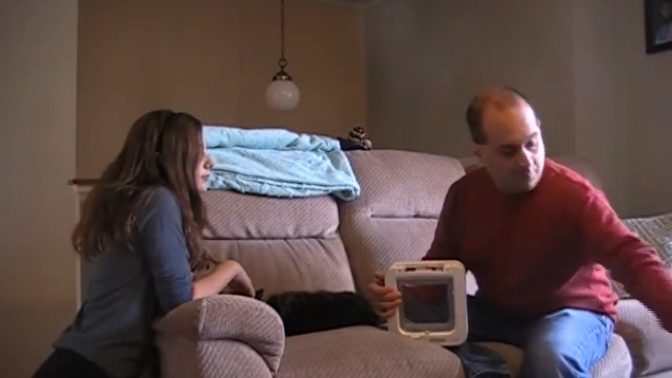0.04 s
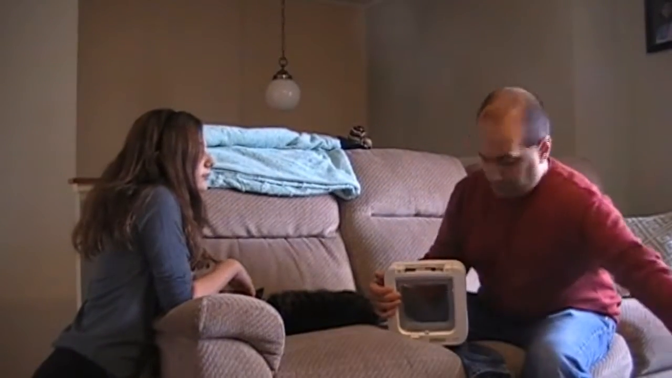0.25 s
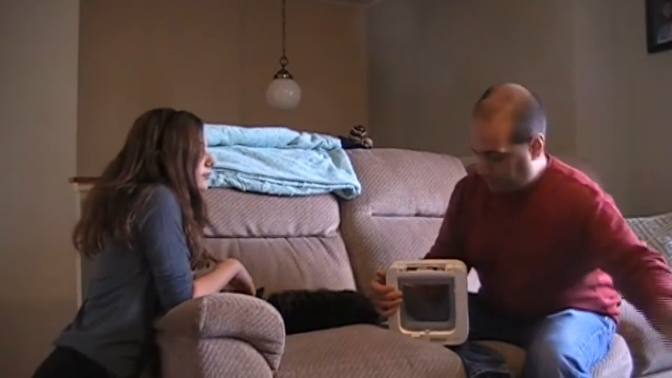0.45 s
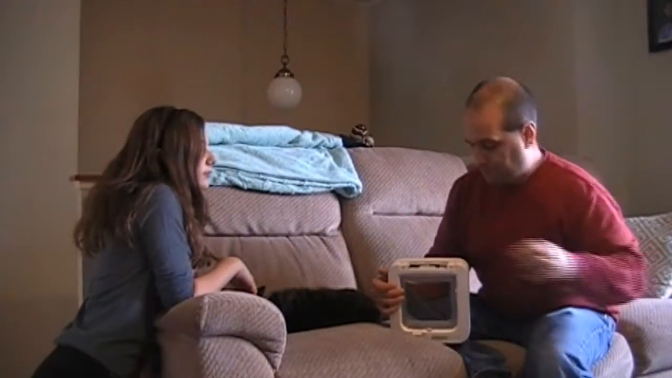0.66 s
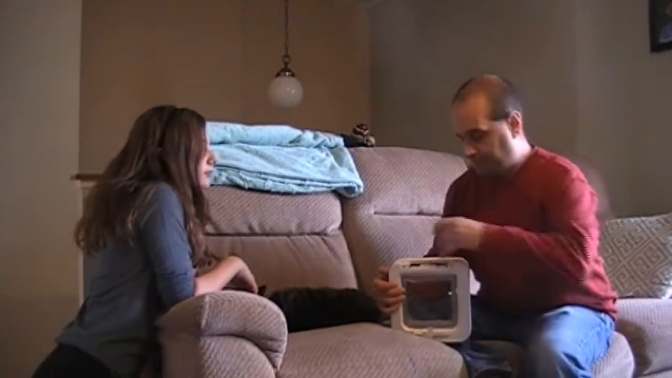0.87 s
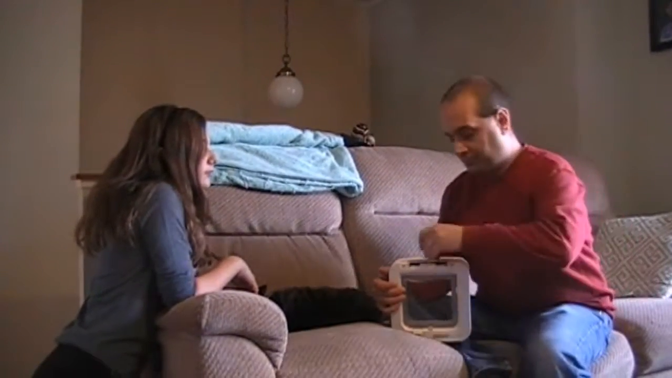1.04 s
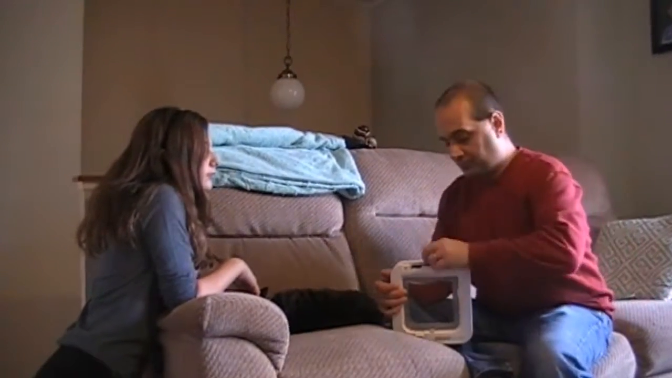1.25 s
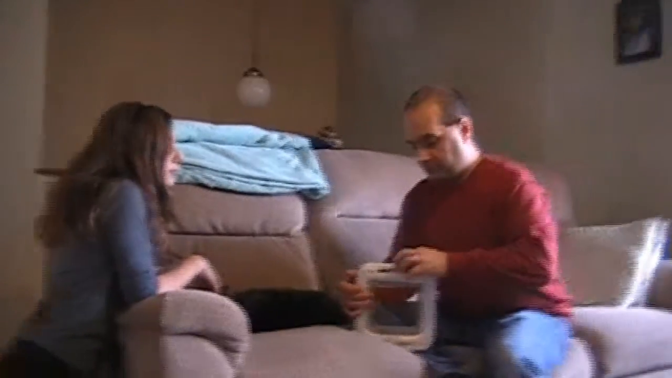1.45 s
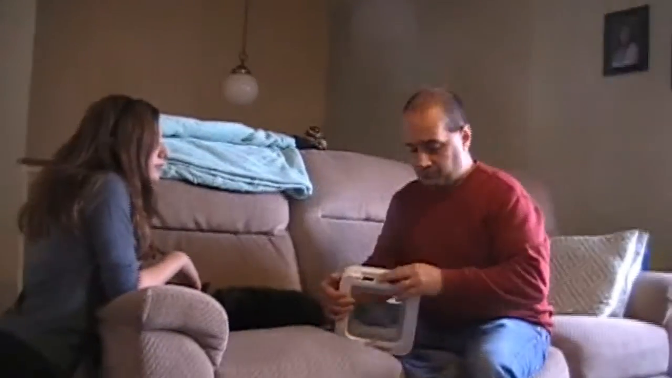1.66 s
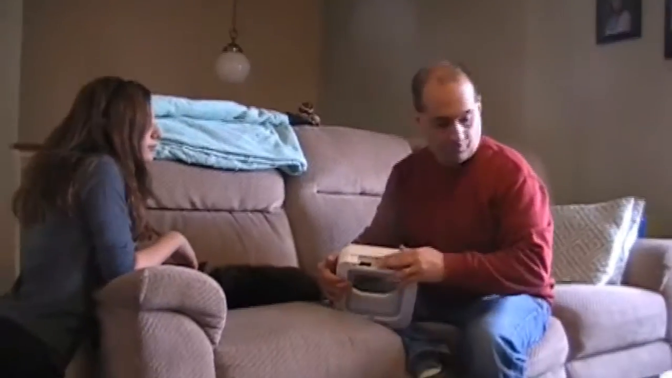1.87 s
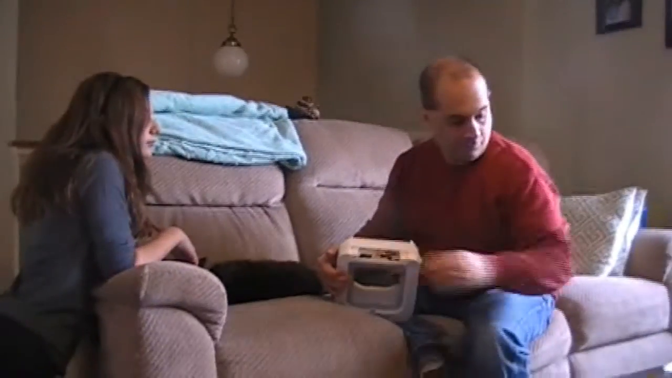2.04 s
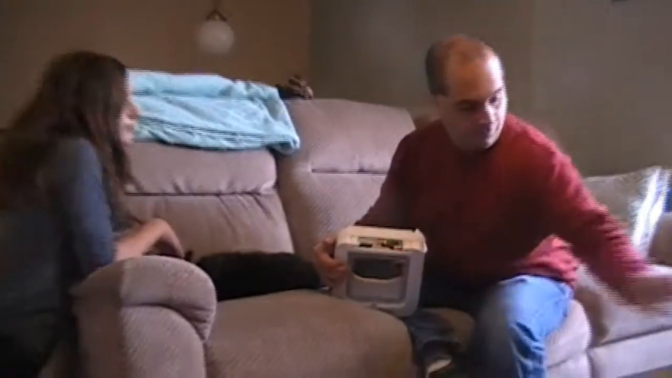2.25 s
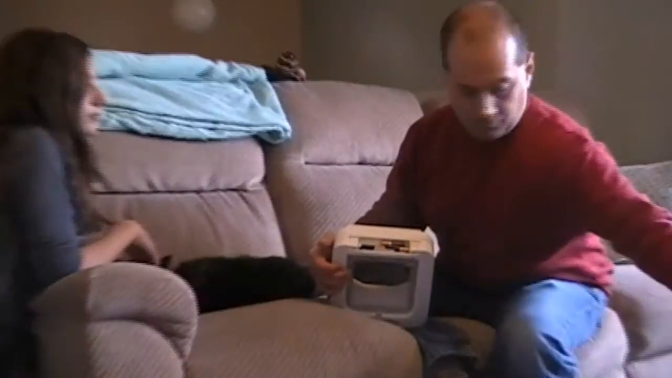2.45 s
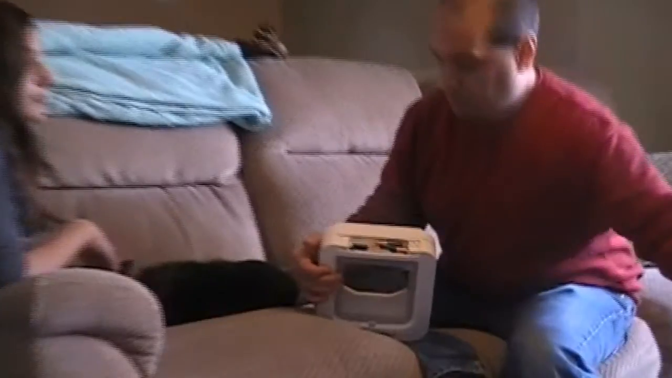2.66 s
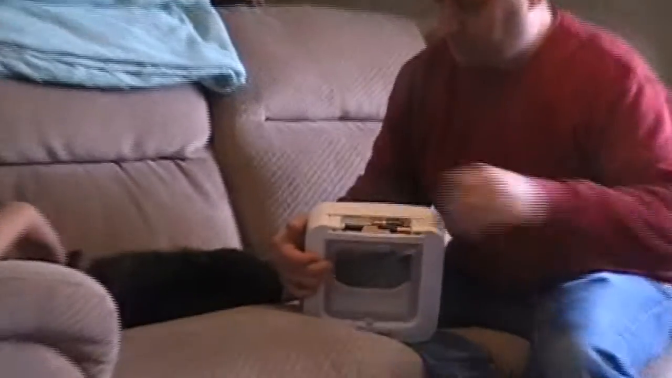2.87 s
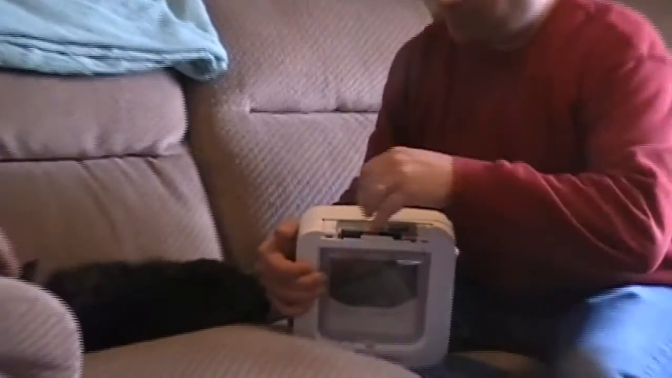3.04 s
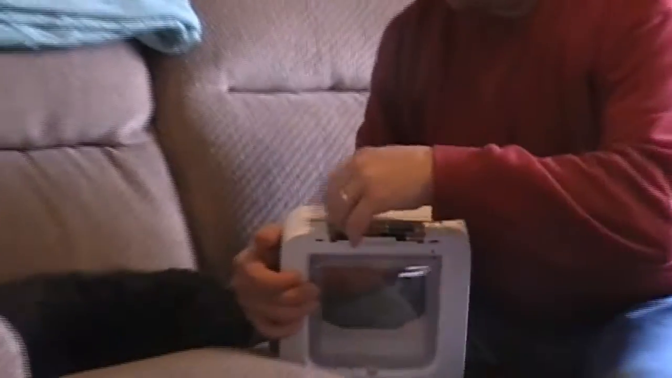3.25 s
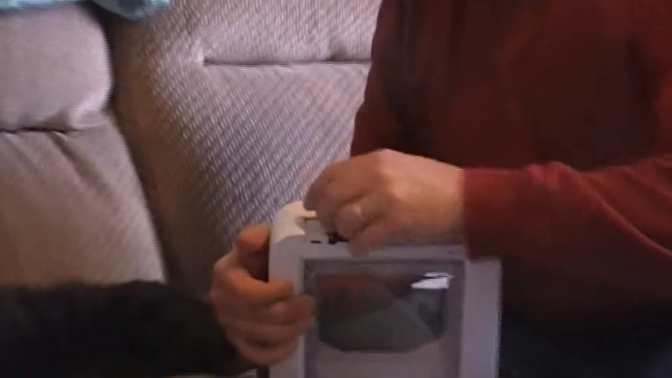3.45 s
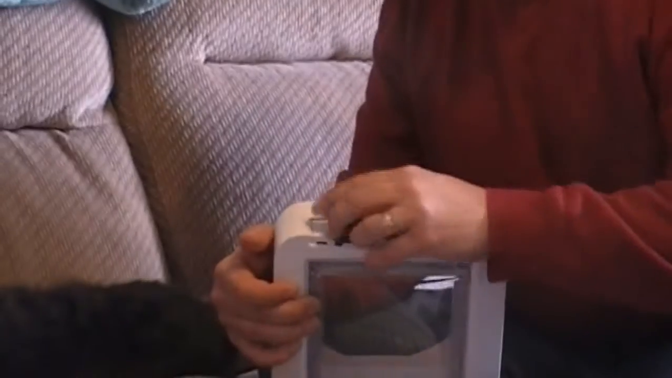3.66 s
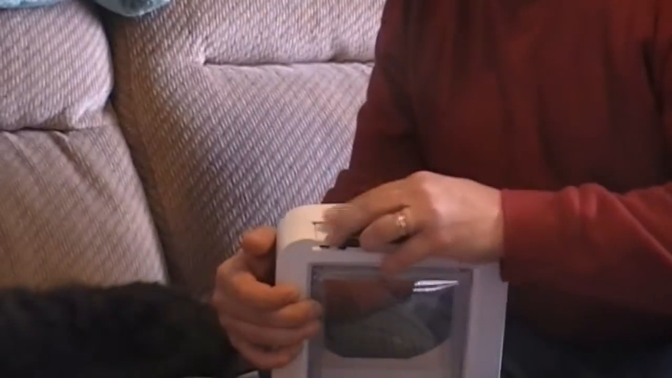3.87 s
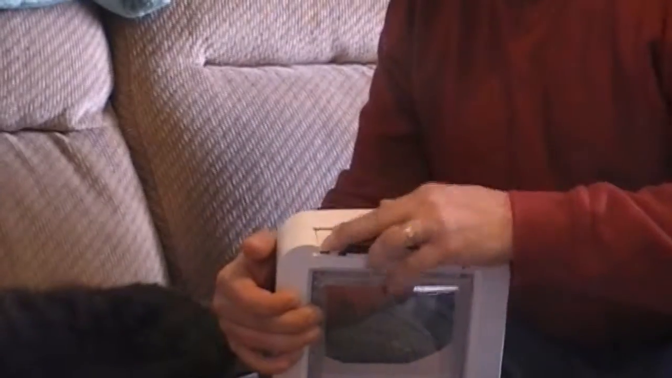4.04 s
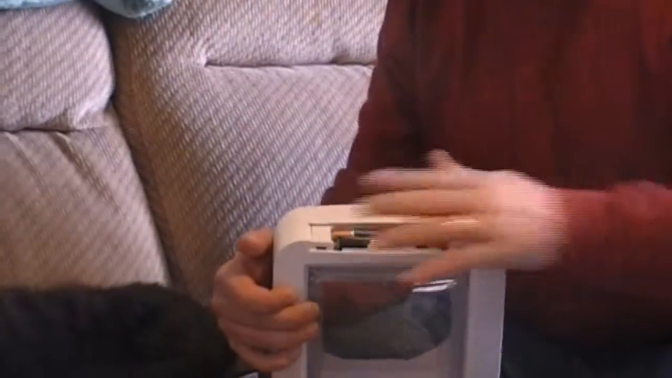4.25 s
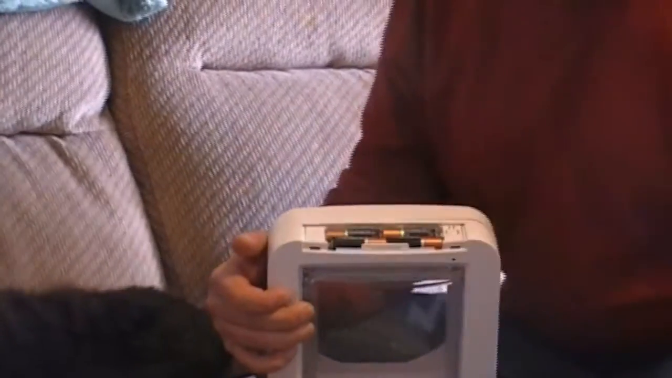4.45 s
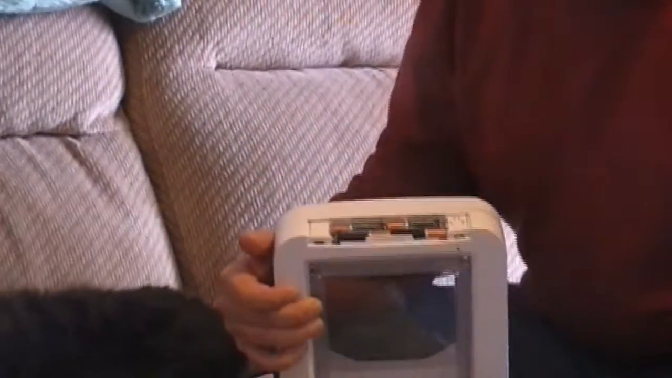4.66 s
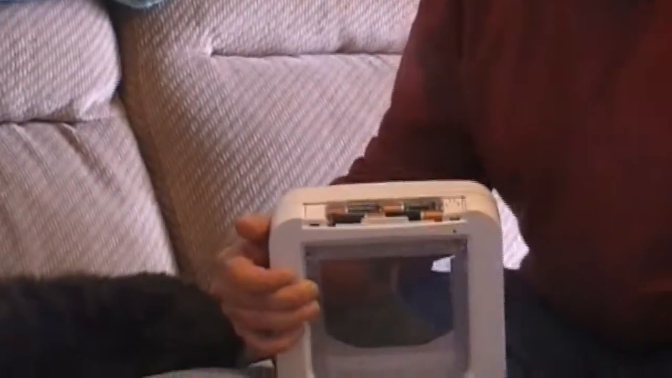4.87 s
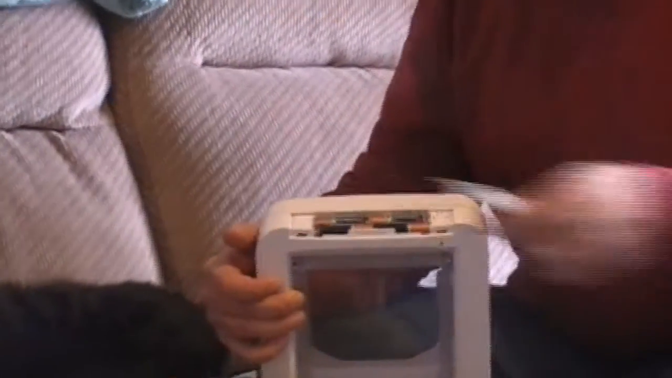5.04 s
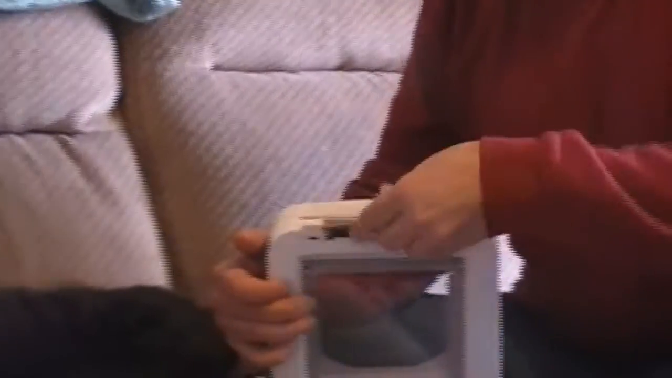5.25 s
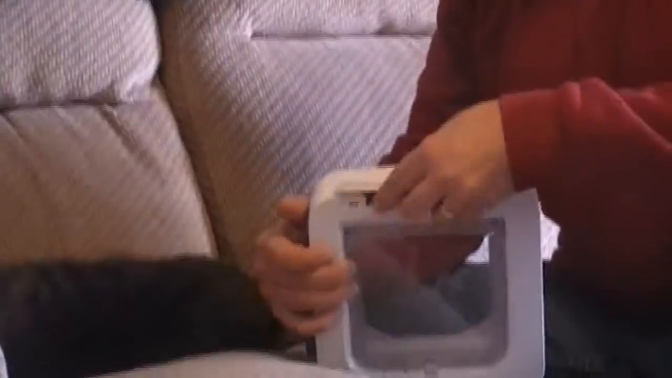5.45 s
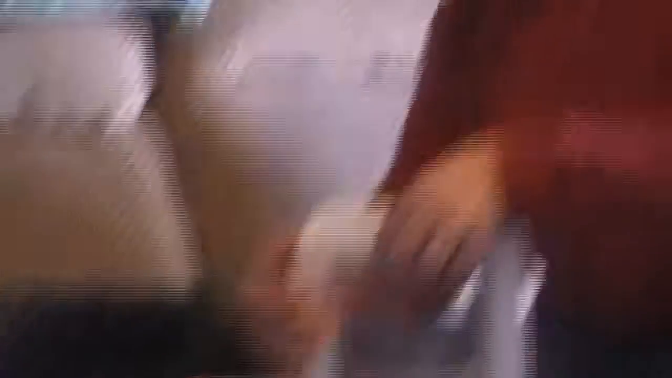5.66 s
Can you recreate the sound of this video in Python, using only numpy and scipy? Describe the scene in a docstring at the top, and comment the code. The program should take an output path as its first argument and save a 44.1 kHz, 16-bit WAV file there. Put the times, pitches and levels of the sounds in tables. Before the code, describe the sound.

A small furnished living room heard through a hand-held camcorder's stereo microphone, with constant soft hiss and a thin fluttering tape-drive whine. The first second is nearly quiet: faint taps and a soft low sofa rub. At 1.0-1.1 s plastic knocks lead to a hard, bright battery snap at 1.2 s, ringing shortly into the room. Dry, close camera-body clicks follow from 1.5 s, sharpest at 1.8 s. From 2 to 4.5 s a faint zoom motor hums, with a barely audible low hum near 2.1 s and weak taps around 2.5 s. Knocks resume at 3.15 s, a close click at 3.4 s, firm knocks at 3.7 s, and the loudest, overloaded crack at 3.9 s. Its tail fades into quiet with tiny ticks. Around 4.8 s comes a brief plastic scrape with clicks, then from 5.2 s lighter rattling clicks and slides, ending in stronger snaps and a close camera click at 5.65 s.

```python
"""A carpeted living room: batteries and then a lid are pushed into the plastic frame of a cat flap, a few metres
from a hand-held camcorder with a stereo microphone. Bursts of contact chatter ring damped plastic modes and fill
the room. The camera's own buttons ring its shell, dry and close. Shaped noise makes plastic slides, sofa creaks
and a low hum; under them lie tape-drive tones, a zoom motor, ticks and hiss. The loudest snaps overload the input."""
import sys
import numpy as np
from scipy import signal
from scipy.fft import rfft, irfft
from scipy.io import wavfile
from scipy.ndimage import uniform_filter1d

SR = 44100
rng = np.random.default_rng(int(sys.argv[2]) if len(sys.argv) > 2 else 0)


def put_to_file(sound):
    """Save the sound as 16-bit audio at rate SR, in the file named by the first command-line argument."""
    columns = np.atleast_2d(sound).T  # one column per channel
    safe = np.clip(columns, -1, 1)
    whole_steps = np.round(safe * 32767)
    wavfile.write(sys.argv[1], SR, whole_steps.astype(np.int16))


N = 251678  # samples


def amp(db):
    """Decibels to amplitude."""
    return 10 ** (np.asarray(db) / 20)


def evened(x):
    """Scales a signal to an RMS of one."""
    return x / np.sqrt(np.mean(x ** 2) + 1e-20)


def read(points, hz):
    """Reads a curve between its points, along log frequency."""
    f, value = np.transpose(points)
    return np.interp(np.log(hz + 1), np.log(f + 1), value)


def pan(db):
    """Left and right gains that differ by db; positive leans left."""
    return amp([[db / 2], [-db / 2]])


def ring(x, hz, width):
    """One damped mode: a wider resonance dies sooner."""
    pole = np.exp((2j * hz - width) * np.pi / SR)
    return signal.lfilter([1], [1, -pole], x).imag


# plastic knocks across the room, many on the cat-flap frame
# columns: start_s, level_db (usual peak of the middle band), then relative to it
# bass_db, presence_db, treble_db, and contact_ms (time scale of the push)
KNOCKS = [(0.1594, -49.5, -4, -25, -25, 1.5), (0.2494, -69, 17, -16, -17, 7.8),
          (0.4894, -67.5, 16.5, -19, -9, 3.2), (0.9872, -34, 7, -12, -13, 6.9),
          (1.0919, -23, -4, -14, -20.5, 6.2), (1.1724, -46, 8.5, 3, 2, 2.5),
          (1.2002, -15, -8.5, -7, -11.5, 5.2), (1.2117, -17.5, -19, -4, -6.5, 11.7),
          (1.216, -11.5, -5.5, -13, -5.5, 2.94), (1.2226, -5, -27.5, -4, -8.5, 2.34),
          (2.4354, -61.5, 15.5, -1, -14, 11), (2.4713, -52, 9.5, 1.5, -14.5, 8.2),
          (2.5094, -59.5, 10, -4.5, -15, 3.7), (2.6694, -59, 5, -30, -15, 2),
          (3.1517, -25.5, 2, -16, -17, 3.65), (3.1876, -33, -1, 0.5, -23.5, 2.9),
          (3.1916, -25, -0.5, -19, -11.5, 4.3), (3.6668, -16.5, -8.5, -20, -16.5, 3.5),
          (3.6814, -19.5, -8, -9.5, -11.5, 5.9), (3.7838, -22.5, -3, -11, -17.5, 4.9),
          (3.8975, -1.5, -14, 4.5, 0, 2.07), (4.6114, -42.5, -4.5, 0, 7.5, 2.9),
          (4.7656, -22.5, -49, -4, 1, 2.5), (4.7744, -21.5, -26, -7, 3, 3.6), (4.7824, -31, -2, 4, 14, 9.6),
          (4.7895, -18.5, -12.5, -8, 4.5, 1.35), (5.1657, -50.5, 9, 3, -3, 3.6),
          (5.23, -28, -37, -4.5, -6.5, 3.6), (5.2869, -27, -3, -19, -22, 5.7),
          (5.3104, -33.5, 4, 1, 3, 5.9), (5.3892, -29, -6, -20, -9, 3.7), (5.402, -38, 10.5, -16, 1, 5.2),
          (5.4116, -30, -18, -5, -6, 3.8), (5.4889, -23.5, -3.5, -4, -3, 3.9),
          (5.6366, -17.5, -10, -5.5, -0.5, 5.8), (5.6544, -21.5, -10, -5, -3, 6.3)]
# resonances of the plastic: pitch_hz, width_hz, level_db (height of the resonance)
PLASTIC_MODES = [(503, 201, -2.5), (755, 344, -4.5), (1162, 130, 0), (1461, 220, 0.5), (1663, 170, 0),
                 (1898, 100, 5), (2590, 880, -7), (3320, 250, -1), (3776, 510, -7), (4470, 280, -1.5),
                 (5760, 1100, -5.5), (7320, 890, -2.5), (9100, 1500, -9.5), (12500, 3500, -27)]


def plastic_knocks():
    """Plastic knocks across the room, many on the cat-flap frame, ring damped modes: direct sound and room send."""
    return strikes(KNOCKS, PLASTIC_MODES, clean=0.19, side_db=1.1, wet_db=-7.0, thump_db=-36)


# first reflections off sofa, floor and walls: delay_ms, level_db
ECHOES = [(5., -9.5), (7.5, -12.5), (12., -13), (17.5, -17.5)]


def first_reflections(knocks):
    """Delayed, weaker copies of the knocks; every second one swaps left and right."""
    early = np.zeros_like(knocks)
    for k, (ms, db) in enumerate(ECHOES):
        facing = knocks[::(-1) ** k]
        early += amp(db) * np.roll(facing, round(ms * SR / 1000), 1)
    return early


# presses on the camera body, close to the microphone
# columns: start_s, level_db, bass_db, presence_db, treble_db, contact_ms, as for the knocks
BUTTONS = [(1.4895, -42, 17.5, -15, -27, 1.4), (1.5127, -47, 12.5, -7, 1, 2.3),
           (1.6118, -35, -13, -2.5, -6.5, 1.47), (1.6447, -41, -3, 2.5, 7, 1.18),
           (1.672, -38, -5, 0, -16, 4.5), (1.6828, -18.5, -11, 2.5, 3, 2.26),
           (1.7811, -22.5, 8, 4, -5, 1.24), (1.8064, -0.5, -6.5, 2.5, 1, 0.5),
           (1.8155, -20.5, -0.5, -7.5, -19, 1.2), (1.8265, -26, 5.5, -3.5, -22, 1.46),
           (1.9804, -43, -19.5, -10, -22, 1.1), (2.0552, -55, 10, -14, -22, 1.18),
           (3.3585, -31, -13, -19, -32, 2.9), (3.378, -10.5, -10.5, -0.5, -1.5, 2.84),
           (3.4505, -28, -19, -22, -26, 2.3), (4.6025, -31.5, -1.5, -6.5, -20.5, 1.1),
           (5.445, -17, -1, 1.5, 2.5, 1.66), (5.6658, -11, 3, 4, -10, 2.26),
           (5.682, -27, 16, -21, -25, 2.6)]
# resonances of the camera shell: pitch_hz, width_hz, level_db
SHELL_MODES = [(809, 163, 0), (1320, 610, -8), (1890, 360, -4), (2800, 750, -6.5), (3670, 600, -5),
               (5020, 530, -8), (6230, 790, -7.5), (7460, 580, -2), (8900, 1000, -9.5),
               (11200, 2900, -18.5)]


def camera_buttons():
    """Presses ring the camera shell, with more clean impact and much less room than the knocks."""
    return strikes(BUTTONS, SHELL_MODES, clean=0.37, side_db=.2, wet_db=-28, thump_db=-38)


# centres of the thump, bass, middle, presence and treble bands: pitch_hz
BAND_HZ = [170, 700, 1800, 3800, 7500]
# what differs between the two microphone ports, per band: level_db
SIDE_DB = [-15, -10, -11.5, -11.5, -8]
WETTER_WHEN_SOFT = 0.14  # dB more room for each dB softer: faint blows are screened from direct view
THUMP_GROWTH = 0.31  # the lowest band grows faster than the blow, dB per dB


def strikes(rows, modes, clean, side_db, wet_db, thump_db):
    """A burst of contact chatter rings the modes; each blow's band levels set its colour."""
    size, lead = 4096, 512  # samples per blow, and before the modes start
    t, hz = (np.arange(size) - lead) / SR, np.fft.rfftfreq(size, 1 / SR)
    direct, sent = np.zeros((2, N + size)), np.zeros(N + size)
    impulse = (t == 0).astype(float)
    body = sum((-1) ** k * amp(db) * w * ring(impulse, f, w) for k, (f, w, db) in enumerate(modes))
    shares = []
    for one in np.eye(len(BAND_HZ)):
        slope = read(list(zip(BAND_HZ, one)), hz)
        shares.append(np.sin(np.pi / 2 * slope) ** 2)
    bands = irfft(rfft(body) * np.array(shares))  # overlapping bands that sum to the body
    share = np.clip(clean, 0, 1)
    for s, db, bass, presence, treble, ms in rows:
        u = np.arange(size) / SR * 1000 / max(ms, .1)
        force = np.sqrt(u) * np.exp(-2 * u)
        energy = np.linalg.norm(force)
        typical = 2 * np.sqrt(signal.fftconvolve(bands ** 2, force[None] ** 2).max(1))  # usual peaks
        colour_db = [thump_db + THUMP_GROWTH * db, bass, 0, presence, treble]
        weights = amp(db) * amp(colour_db) / typical
        tap = weights @ bands

        noise, side_noise = rng.standard_normal((2, size))
        chatter = np.sqrt(1 - share ** 2) * noise * force
        chatter[force.argmax()] += share * energy  # one clean impact among the rattle
        mid = signal.fftconvolve(chatter, tap)[:size]
        apart = signal.fftconvolve(side_noise * force, weights * amp(SIDE_DB) @ bands)[:size]

        at = round(s * SR) - lead
        direct[:, at:at + size] += pan(side_db) * [mid + apart, mid - apart]
        # the room averages the chatter out
        sent[at:at + size] += amp(wet_db - WETTER_WHEN_SOFT * db) * energy * tap
    return direct[:, :N], sent[:N]


# decay of the living room: pitch_hz, t60_s
ROOM_DECAY = [(200, 0.84), (530, 0.62), (1390, 0.53), (1900, 0.57), (3680, 0.52), (9000, 0.41),
              (14000, 0.26)]
# side tail against middle tail: pitch_hz, level_db
ROOM_SIDE = [(60, 1), (180, -9), (550, -10), (1650, -11), (4970, -10), (15000, 4)]


def room(x):
    """Sparse taps of random sign, each band dying at its own speed, in a mid and a side tail.
    Three tails take turns so that neighbouring blows scatter differently."""
    out, turn = np.zeros((2, N)), 2 * np.pi * 3.1 * np.arange(N) / SR
    for k in range(3):
        taps = np.zeros((2, SR))
        at = np.arange(200, SR - 20, 10) + rng.integers(0, 10, (2, (SR - 211) // 10))
        np.put_along_axis(taps, at, rng.choice([-1., 1.], at.shape), 1)
        hz, t, z = signal.stft(taps, SR, nperseg=256)
        z = z * amp(-60 * t / read(ROOM_DECAY, hz)[:, None])
        z[1] *= amp(read(ROOM_SIDE, hz))[:, None]
        mid, side = signal.istft(z, SR, nperseg=256)[1]
        tail = np.array([mid + side, mid - side]) / np.linalg.norm(mid)
        share = np.sqrt(2 / 3) * np.cos(turn + 2 * np.pi * k / 3)
        out += signal.fftconvolve((x * share)[None], tail, axes=1)[:, :N]
    return out * pan(0.77)


# plastic sliding on plastic: peak_s, level_db (RMS at the peak), rise_s, fall_s (each across STROKE_DB)
SLIDES = [(4.62, -48.5, 0.038, 0.42), (4.785, -21, 0.051, 0.017), (5.25, -50.5, 0.062, 0.67),
          (5.42, -41, 0.064, 0.17)]
# colour of the slides: pitch_hz, level_db (per Hz, relative)
SLIDE_COLOUR = [(300, -29), (700, 0.5), (1500, -6.5), (3000, 0), (5000, -4), (8000, -3.5), (11000, -24.5),
                (15000, -33)]


def plastic_slides():
    """Plastic slides on plastic: uneven friction noise under each stroke."""
    return rubbing(swells(SLIDES), SLIDE_COLOUR, uneven_db=2.05)


# weight shifting on the sofa: peak_s, level_db, rise_s, fall_s, as for the slides
SHIFTS = [(.256, -63.5, .07, 0.25), (2.084, -68, 0.075, 0.029), (2.164, -76.5, .1, .25),
          (2.462, -65, 0.062, 0.3), (4.63, -64.5, 0.067, 0.44), (4.82, -53.5, 0.196, 0.071),
          (4.886, -64, 0.045, .15), (5.33, -68.5, .6, 0.94)]
# colour of the sofa: pitch_hz, level_db (per Hz, relative)
SOFA_COLOUR = [(60, -25), (130, -10), (250, 6.5), (400, -6.5), (800, -46)]


def sofa_shifts():
    """Weight shifts on the sofa: low, uneven friction noise."""
    return rubbing(swells(SHIFTS), SOFA_COLOUR, uneven_db=3.0)


# a brief low hum, one row: start_s, stop_s, edge_s, drift_db (from start to stop)
MOAN_SPAN = (2.096, 2.246, 0.028, 1.57)
# colour of the hum: pitch_hz, level_db (per Hz, relative)
MOAN_COLOUR = [(260, -45), (305, 4.5), (350, -42)]
MOAN_DB = -66  # RMS before the drift


def low_moan():
    """A brief low hum: uneven noise in a narrow band."""
    return rubbing(amp(MOAN_DB) * held(*MOAN_SPAN), MOAN_COLOUR, uneven_db=3.5)


def rubbing(level, spectrum, uneven_db):
    """Dense slips whose strength jumps every 64 samples, coloured and shaped by the level."""
    hz = np.fft.rfftfreq(N, 1 / SR)
    strength_db = uneven_db * rng.exponential(1, N // 64 + 1).repeat(64)[:N]
    slips = rng.standard_normal(N) * amp(strength_db)
    return level * evened(irfft(rfft(slips) * amp(read(spectrum, hz)), N))


STROKE_DB = 30


def swells(rows):
    """Each stroke climbs to its peak and falls away, evenly in dB."""
    t = np.arange(N) / SR
    return sum(amp(db - STROKE_DB * np.maximum((s - t) / rise, (t - s) / fall)) for s, db, rise, fall in rows)


def held(start, stop, edge, drift_db):
    """Fades in, holds while drifting in level, fades out."""
    t = np.arange(N) / SR
    fade = np.clip(np.minimum(t - start, stop - t) / edge, 0, 1) ** 2
    return fade * amp(drift_db * (t - start) / (stop - start))


# zoom motor running, one row: start_s, stop_s, edge_s, drift_db (from start to stop)
ZOOM_SPAN = (2, 4.5, 0.2, -5.5)
# motor orders: pitch_hz, level_db (before ZOOM_GAIN_DB and the drift)
ZOOM_HUM = [(226, -80.5), (452, -79.5)]
GEARS_HZ, GEARS_WIDTH_HZ, GEARS_DB = 2177, 280, -71  # level before ZOOM_GAIN_DB and the drift
ZOOM_GAIN_DB = 3.5


def zoom_motor():
    """Wavering motor tones plus gear hiss, fading in and out and sagging in level."""
    t, motor = np.arange(N) / SR, np.zeros(N)
    for hz, db in ZOOM_HUM:
        level = amp(db + 1.2 * slow()) * np.sqrt(2)
        motor += level * np.sin(2 * np.pi * hz * t + 0.43 * slow())
    gears = amp(GEARS_DB) * fuzzy(GEARS_HZ, GEARS_WIDTH_HZ)
    return (motor + gears) * amp(ZOOM_GAIN_DB) * held(*ZOOM_SPAN)


def fuzzy(hz, width):
    """A narrow hiss: noise through one mode twice."""
    return evened(ring(ring(rng.standard_normal(N), hz, width), hz, width))


def slow():
    """A slow random wander with an RMS of one."""
    return evened(uniform_filter1d(uniform_filter1d(rng.standard_normal(N), 1500), 1500))


# tape-drive tones: pitch_hz, level_db (before the trim below), left_minus_right_db, flutter_db
WHINE = [(721, -93, -3.5, 2.5), (1080, -66.5, 0.5, 2.5), (1443, -90.5, 5, -0.5), (7709, -66, 6.5, 1.)]
WHINE_TRIM_DB, WHINE_SINKS_DB_PER_S = -2, -0.62  # the whine slowly gets fainter


def tape_whine():
    """Continuous tape-drive tones that flutter in level and phase."""
    t, tones = np.arange(N) / SR, np.zeros((2, N))
    for hz, db, side, flutter_db in WHINE:
        level = amp(db + flutter_db * slow()) * np.sqrt(2)
        tones += pan(side) * level * np.sin(2 * np.pi * hz * t + 0.26 * slow())
    return tones * amp(WHINE_TRIM_DB + WHINE_SINKS_DB_PER_S * t)


# faint pitched ticks: start_s, level_db (of the impulse)
TICKS = [(1.979, -46.5), (4.3341, -52), (4.4006, -53.5), (4.4333, -52.5), (4.5007, -51), (5.068, -54),
         (5.102, -52)]
TICK_HZ, TICK_WIDTH_HZ = 2830, 96


def faint_ticks():
    """Single impulses ring one narrow mode."""
    clicks = np.zeros(N)
    for s, db in TICKS:
        clicks[round(s * SR)] = amp(db)
    return ring(clicks, TICK_HZ, TICK_WIDTH_HZ)


# colour of the hiss: pitch_hz, level_db (per Hz, relative)
HISS_COLOUR = [(12, -64.5), (20, -34), (229, -5), (503, -3), (630, -5.5), (932, -10.5), (1070, -4.5),
               (1310, -11.5), (1730, -10.5), (4360, -21.5), (7220, -21.5), (7860, -16), (8550, -23.5),
               (15000, -41), (16300, -43)]
# left-right likeness of the hiss: pitch_hz, likeness (1 same, 0 unrelated, -1 opposite)
HISS_LIKENESS = [(60, 0.1), (150, -0.77), (380, -0.81), (950, 0.022), (2380, -0.11), (5980, 0.77),
                 (15000, 0.28)]
HISS_DB = -63.5  # RMS of the left-right average


def hiss():
    """Continuous camera hiss under everything."""
    return amp(HISS_DB) * coloured(HISS_COLOUR, HISS_LIKENESS, patchy_db=1.5)


def coloured(spectrum, likeness, patchy_db):
    """Two-channel noise with drifting patches of level."""
    hz = np.fft.rfftfreq(1024, 1 / SR)
    a, b, c, d, patches = rng.standard_normal((N // 256 + 5, 513, 5)).T
    patches = evened(uniform_filter1d(uniform_filter1d(patches, 10, 0), 12, 1))
    same = np.clip(read(likeness, hz), -1, 1)[:, None]
    left = a + 1j * b
    right = same * left + np.sqrt(1 - same ** 2) * (c + 1j * d)
    z = np.array([left, right]) * amp(read(spectrum, hz)[:, None] + patchy_db * patches)
    x = signal.istft(z, nperseg=1024, noverlap=768)[1][:, :N]
    return x / x.mean(0).std()


def scene():
    """Knocks, buttons and rubs, their room, and the camera's own noise."""
    knocks, far = plastic_knocks()
    buttons, near = camera_buttons()
    slides = plastic_slides()
    blows = knocks + first_reflections(knocks) + buttons
    rubs = slides * pan(0.98) + sofa_shifts() + low_moan()
    reverb = room(far + near + amp(-7.5) * slides)
    camera = zoom_motor() + tape_whine() + faint_ticks() + hiss()
    return blows + rubs + reverb + camera


EDGE_HZ = 16400


def record(dry):
    """Hard input overload just under full scale, then the band limit."""
    taps = signal.firwin(511, EDGE_HZ, window=("kaiser", 9), fs=SR)
    overloaded = np.clip(dry, -.92, .92)
    return np.clip(signal.oaconvolve(overloaded, taps[None], "same"), -1, 1)


dry = scene()
out = record(dry)
put_to_file(out)
```